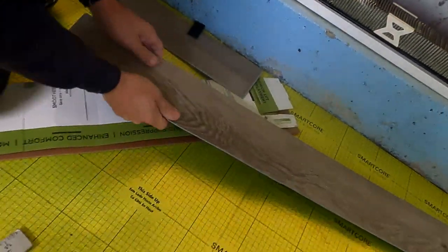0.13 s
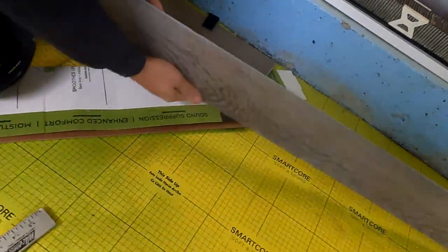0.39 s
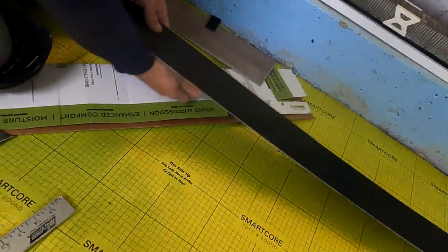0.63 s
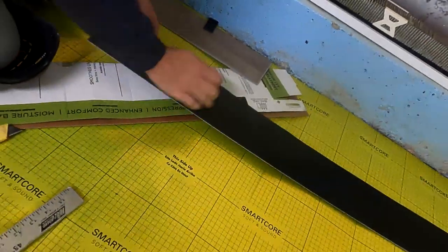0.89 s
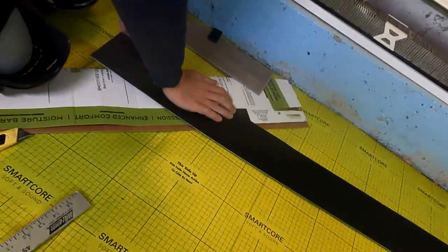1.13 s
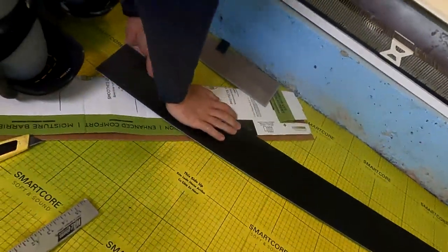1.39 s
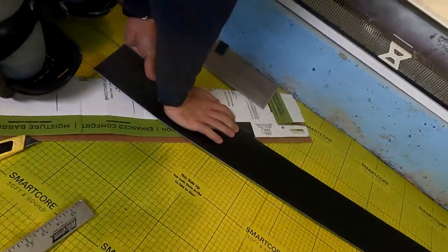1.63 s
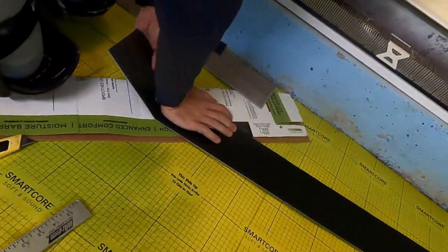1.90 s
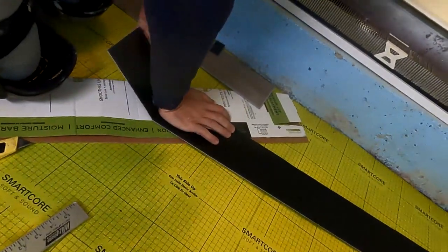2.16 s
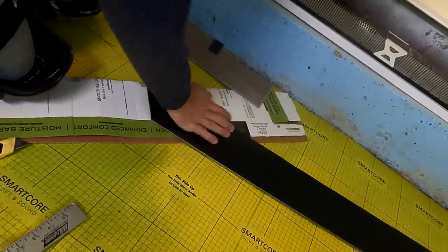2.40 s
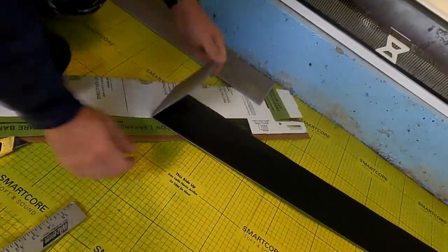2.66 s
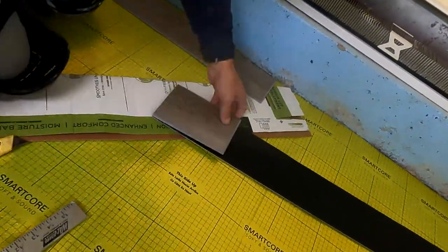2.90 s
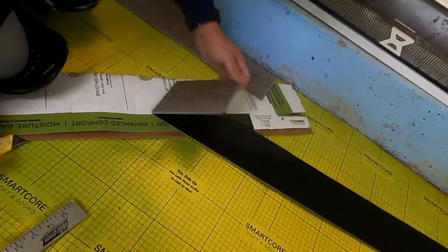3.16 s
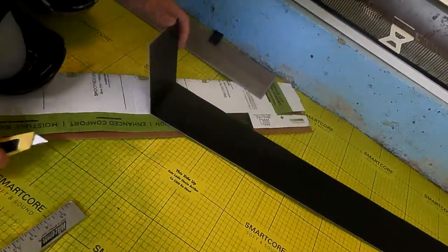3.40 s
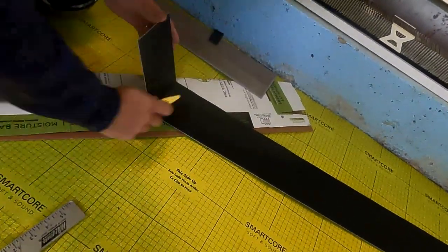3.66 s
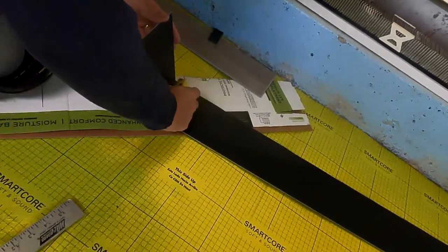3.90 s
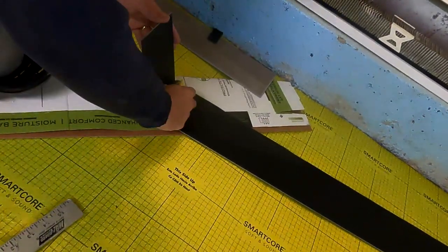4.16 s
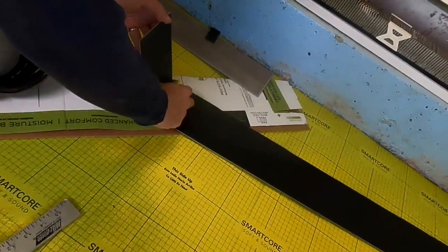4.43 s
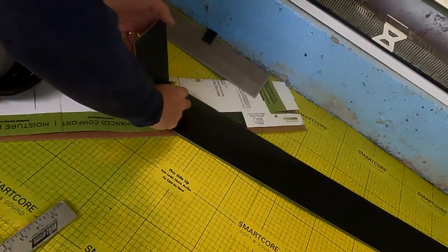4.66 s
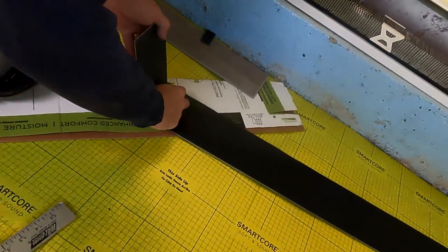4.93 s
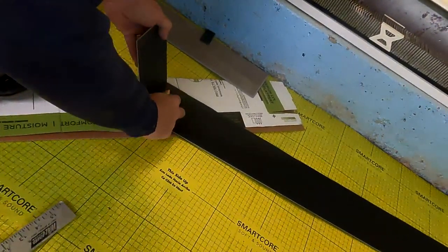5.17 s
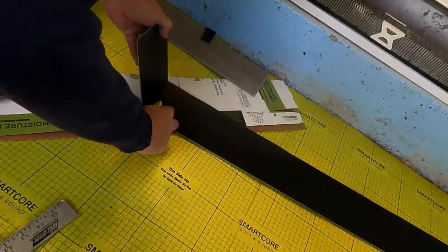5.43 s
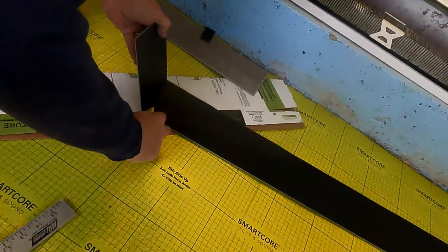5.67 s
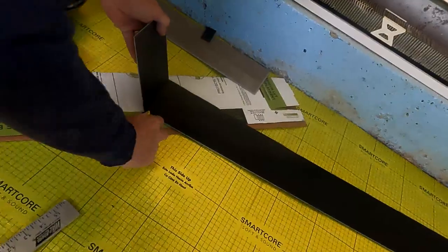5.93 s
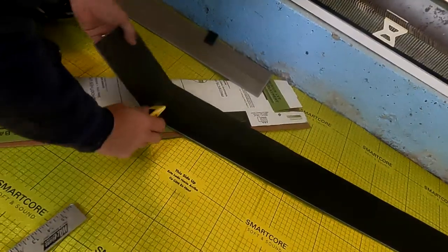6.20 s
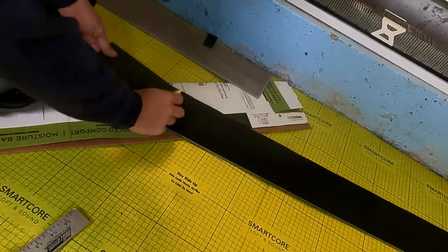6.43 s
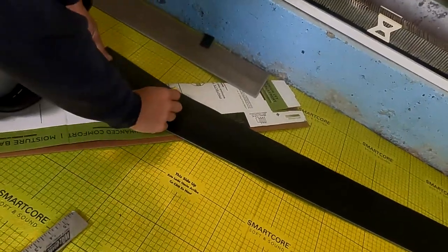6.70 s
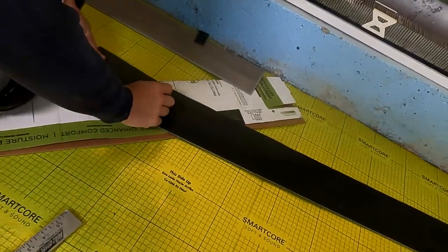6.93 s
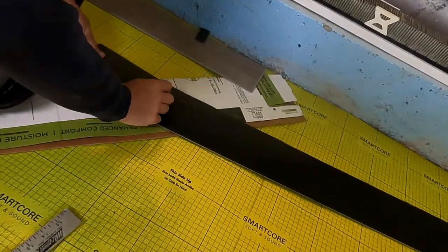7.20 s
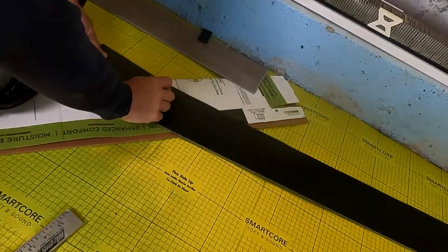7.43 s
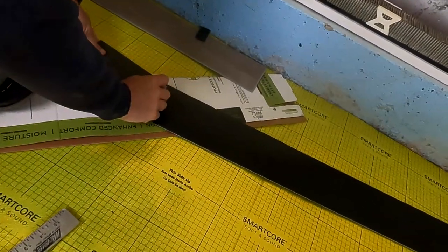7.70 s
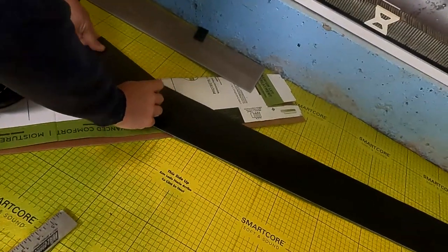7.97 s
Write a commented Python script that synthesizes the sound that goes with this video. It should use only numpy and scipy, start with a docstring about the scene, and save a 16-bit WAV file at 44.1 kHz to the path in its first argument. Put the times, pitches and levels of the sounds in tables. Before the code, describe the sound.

A deep steady machine hum and faint electric tones lie under close stereo handling sounds. A vinyl plank scuffs, thuds and slaps as it is flipped, then cracks loudly along its score. Small knocks and bright metallic knife ticks come next, a quiet pause, then a stuttering, buzzing cut about half a second long. A knock, a few clicks and soft rubs end it in a short-ringing hard room.

```python
"""Soft rubbing and knocks of a vinyl floor plank come first, over a deep machine hum and faint electric tones.
The plank is turned over, snapped along its score and folded; knife clicks come before and after the snap,
and later the utility knife cuts the backing. Short blows ring modes of plank and knife, shaped noise makes
the rubbing, and stick-slip drives the cut. A small hard room answers; two microphone ports sit close by."""
import sys
import numpy as np
from scipy import signal
from scipy.fft import rfft, irfft, next_fast_len
from scipy.io import wavfile
from scipy.ndimage import uniform_filter1d

SR = 44100
rng = np.random.default_rng(int(sys.argv[2]) if len(sys.argv) > 2 else 0)


def nominal_scale(level):
    """Amplitude ratio for a level in decibels (scalar or array-like)."""
    x = np.asarray(level, float) / 20
    return 10 ** x


def inscribe(sig):
    """Save sig as 16-bit PCM at rate SR to the path in sys.argv[1].

    A 1-D sig is mono; a 2-D sig holds one channel per row.
    Samples are clipped to [-1, 1] before scaling.
    """
    pcm = np.round(np.clip(np.atleast_2d(sig).T, -1, 1) * 32767)
    wavfile.write(sys.argv[1], SR, pcm.astype(np.int16))


N = 356313
T = np.arange(N) / SR  # time of each sample [s]

# Slides of plank, hands, sleeves and blade:
# (start [s], length [s], scuff level [dB], hiss level [dB], swell from start to end [dB])
SLIDES = [(0.0, 11, -76.5, -79, -0.5), (0.0, 0.32, -54.5, -52.5, -1), (0.304, 0.27, -59, -56, 5),
          (0.615, 0.19, -53.5, -50, 16), (0.78, 0.12, -42.5, -52, 10.5), (0.95, 0.15, -75, -54.5, 2),
          (1.156, 0.072, -42, -47, -2), (1.344, 0.14, -43.5, -48, 7), (1.566, 0.27, -64, -68.5, 5),
          (2.136, 0.57, -65.5, -58.5, -3.5), (2.789, 0.12, -66, -62, -9), (2.96, 0.012, -41, -48, -13),
          (3.01, 0.18, -86, -65, -3.5), (3.304, 0.076, -53.5, -59.5, -7.5), (3.436, .05, -73, -56.5, 0),
          (3.47, 0.04, -62.5, -54.5, 0), (3.668, 0.06, -58, -54, -2.5), (3.834, 0.17, -67, -67, -2.5),
          (4.02, 0.53, -71.5, -90, -8), (4.297, 0.052, -69.5, -68.5, -11), (4.677, 0.067, -88, -75.5, 12.5),
          (4.846, 0.045, -65, -62, 10.5), (5.1, 0.049, -71, -63, 7.5), (5.151, 0.2, -50, -55.5, 0.5),
          (5.33, 0.4, -53, -53, -2), (5.9, 0.065, -47, -58.5, -3), (6.095, 0.2, -68.5, -63, 9.5),
          (6.33, 0.2, -62.5, -59.5, -11), (6.622, 0.14, -66.5, -65.5, -12), (6.902, 0.59, -65, -83, -4.5),
          (7.772, 0.035, -49.5, -58, 0.5), (7.838, 0.064, -55.5, -62, 4.5), (7.93, 0.12, -63.5, -68, 14.5)]
# Where on the plank the rubbing acts: (time [s], best-driven mode [Hz])
RUB_PLACE = [(0, 800), (.6, 800), (.85, 1400), (1.2, 1200), (1.4, 1500), (2.3, 1300), (2.96, 1400),
             (3.31, 1800), (3.7, 2200), (4.86, 1500), (5.4, 1100), (5.92, 1100), (6.35, 800), (6.65, 1200),
             (7.3, 803), (7.7, 1500), (7.79, 1600), (7.89, 1200), (8.08, 1500)]
# Spectrum of the scuff: (frequency [Hz], relative level [dB])
SCUFF_SPECTRUM = [(290, -26), (500, -4), (589, -7.5), (761, -10), (980, -5), (1460, -7), (2400, -10.5),
                  (3200, -17), (4160, -21), (7040, -45)]
# Spectrum of the sliding hiss: (frequency [Hz], relative level [dB])
HISS_SPECTRUM = [(1470, -30.5), (2500, -5), (2600, -10), (5160, -7.5), (5570, -8.5), (8230, -14.5),
                 (11700, -23), (13700, -29), (15500, -66.5)]
# Centres of the bands that waver alone [Hz]
SCUFF_BANDS_HZ = 350 * 1.4 ** np.arange(8)
HISS_BANDS_HZ = 2000 * 1.4 ** np.arange(7)
# Weight shifting on the floor: (time [s], rumble level [dB])
WEIGHT_SHIFT = [(0.0, -51.5), (0.43, -56), (0.69, -54.5), (2.63, -55), (3.13, -50), (4.59, -62),
                (5.17, -61), (5.36, -59.5), (5.8, -57), (6.05, -60.5), (8.08, -60.5)]
# Spectrum of the floor rumble: (frequency [Hz], relative level [dB])
RUMBLE_SPECTRUM = [(50, -22), (75, -2.5), (130, 6.5), (250, -7.5), (400, -11), (600, -33.5)]
# Faint electric tones: (frequency [Hz], level [dB])
ELECTRIC_TONES = [(183, -67.5), (242.2, -66), (1319, -83), (1561, -78), (1798, -89.5), (1922, -76.5),
                  (2040, -87.5), (2379, -82)]
# Spectrum of the room tone: (frequency [Hz], relative density [dB per Hz])
AIR_SPECTRUM = [(15, -29.5), (25, -7), (53, -14), (62, -10.5), (75, -39.5), (186, -31), (207, -41.5),
                (243, -25.5), (394, -45), (543, -53), (927, -55.5), (1060, -54), (1860, -50), (3260, -74.5),
                (15000, -79.5)]
# How alike the room tone is left and right: (frequency [Hz], likeness [0-1])
AIR_ALIKE = [(60, 0.91), (130, .9), (300, 0), (640, .45), (1400, .3), (3100, .2), (6800, 0.7), (15000, .5)]
# Decay of the room: (frequency [Hz], time to fall 60 dB [s])
ROOM_DECAY = [(100, 0.18), (300, 0.75), (1000, 0.43), (3000, 0.31), (5500, .35), (10000, .2)]
# Knocks on the plank; thump and crack count from the blow level:
# (time [s], blow level [dB], thump below 400 Hz [dB], crack above 3 kHz [dB], best-driven mode [Hz])
KNOCKS = [(0.027, -55.5, 11, 12.5, 1170), (0.141, -38, 0, -17.5, 1140), (0.432, -44.5, 2, 1.5, 1240),
          (0.576, -19.5, -15, -34, 620), (0.648, -37.5, -7, -19, 929), (0.684, -42, -18, 4, 2630),
          (0.776, -28.5, -0.5, -35, 840), (0.82, -15.5, -14.5, -15, 2000), (0.844, -29.5, -11, -2, 2500),
          (0.873, -27, -4, -2, 1730), (0.911, -28, -5.5, -2, 1180), (1.125, -33.5, -24, -15, 1020),
          (1.155, -22, -7.5, -12.5, 1700), (1.176, -20.5, -13, -20, 1010), (1.814, -32, -13, -25, 910),
          (1.823, -23.5, -9, -19, 920), (1.8349, -2, -7, -6.5, 1250), (2.29, -44, -1, -12, 904),
          (2.522, -39, -12, -27, 1190), (2.658, -38, 3, -21.5, 595), (2.797, -50, 3.5, -8, 1570),
          (2.9, -43, 4, -6, 1220), (2.936, -29, -7, -20.5, 1210), (2.945, -19.5, -8.5, -3, 1310),
          (2.951, -19, -5.5, -4, 2300), (3.012, -50, -18, -20, 2100), (3.08, -54.5, 16.5, -6, 2000),
          (3.3, -43, 8, -6, 1910), (3.358, -30.5, -4.5, 5, 2256), (5.882, -22.5, -1, -6.5, 1300),
          (5.955, -40.5, 4, -8.5, 1320), (5.99, -39.5, -8, -2, 1210), (6.011, -44.5, -10, -14, 1500),
          (6.198, -46, -2, -12, 1410), (6.333, -45, 7, -4, 2010), (6.344, -37.5, 3.5, -12, 1000),
          (6.399, -31, -5, -28.5, 610), (6.665, -40.5, -13, -12, 1050), (7.603, -39, -28, -13.5, 1050),
          (7.765, -51, -14, -17, 1140), (7.866, -42.5, -12, -8.5, 1970)]
# Modes of the plank: (frequency [Hz], width [Hz], level [dB])
PLANK_MODES = [(96, 69, -2), (183, 62, -5.5), (318.5, 45, -8), (500, 240, -9), (1020, 180, -7.5),
               (1190, 420, -3.5), (1740, 360, -6), (2300, 550, 0), (3340, 1100, -3), (4700, 800, -2.5),
               (6500, 1700, -5.5), (10080, 3600, -11)]
# Clicks of the knife; body counts from the click level:
# (time [s], click level [dB], body below 2.3 kHz [dB], rattle time [ms], best-driven mode [Hz])
CLICKS = [(0.971, -44, -25, 1.2, 6000), (1.0063, -36.5, -13, 1.2, 4720), (1.0744, -22, -13, 1.5, 4300),
          (1.0843, -23, -17, 1.1, 2530), (1.0957, -26.5, -18, 0.76, 4630), (1.137, -33.5, -20, 1.3, 4200),
          (1.146, -34, -14, 1.9, 4200), (2.61, -40, -21.5, 1.3, 4770), (3.091, -42, -25, 1.2, 8000),
          (3.105, -37, -29, 1.2, 7660), (3.126, -40.5, -42, 4.3, 6240), (3.158, -48, -15, 1.5, 3620),
          (3.19, -50, -22, 0.38, 6000), (3.245, -52.5, -12, 1.25, 6000), (3.353, -33.5, -24.5, 2.2, 5500),
          (3.44, -38, -17, 1.3, 4940), (3.486, -46, -20, 1.5, 7000), (3.4962, -34.5, -15, 1.5, 4830),
          (3.5294, -40.5, -10, 1.4, 5000), (3.561, -25, -18, 1.3, 6520), (3.5738, -24, -14.5, 1.1, 3330),
          (3.652, -41, -20, 1.2, 3900), (3.6643, -21.5, -27, 1.3, 4170), (3.675, -25.5, -32, 0.49, 4270),
          (3.683, -16, -29, 1.7, 4150), (3.6884, -15, -26, 1.4, 5200), (3.698, -32, -20, 1.4, 4300),
          (3.7135, -25, -34, 1.4, 4400), (3.7166, -21.5, -31, 0.93, 4350), (3.7202, -24.5, -32, 1.8, 4250),
          (3.762, -45, -6, 2.5, 2600), (3.8194, -32, -40, 1.8, 3070), (4.295, -32.5, -29.5, 1.1, 4150),
          (4.8791, -42, -5.5, 1.4, 3096), (5.1288, -43.5, 1, 3.5, 2760), (5.9179, -21.5, -20.5, 1.1, 4600),
          (5.9218, -27, -22, 0.9, 4400), (6.3705, -44, -6, 1.6, 5010), (6.45, -40, -6.5, 1.9, 3260),
          (6.627, -18.5, -25, 3, 6000), (6.721, -42, -24, 1.5, 3180), (6.7358, -32, -13, 3.4, 3660),
          (6.7509, -35.5, -17.5, 1.4, 3000), (7.011, -35.5, -27, 2.3, 4160),
          (7.2, -49.5, -22.5, 1.74, 3500), (7.39, -55.5, -23, 1.5, 3190), (7.558, -53.5, -6.5, 1.7, 2980),
          (7.725, -52.5, -2, 1.6, 4000), (7.975, -52, -3, 2.2, 5500), (8.03, -54, -8, 1.5, 6000),
          (8.058, -51, -18, 1.5, 7500)]
# Modes of the knife handle: (frequency [Hz], width [Hz], level [dB])
KNIFE_MODES = [(1400, 620, -9.5), (1926, 680, -1), (2630, 370, -2.5), (3190, 410, -8.5), (4184, 640, 3),
               (5020, 590, -6.5), (5650, 4900, 3), (6870, 520, -4.5), (8100, 4000, 4.5), (9900, 4500, -7),
               (12500, 2000, -2)]
# Narrow mode of the blade: (frequency [Hz], width [Hz], level [dB])
BLADE_PING = [(3330, 35, -9)]
# Blade dragged through the backing: (time [s], mean slip rate [slips per s], pressure [dB],
# unevenness [0-1], blade rattle [dB], best-driven mode [Hz])
CUT = [(5.148, 121, -25, 0.51, -18, 1500), (5.17, 119, -3, 0.21, -14, 1500),
       (5.29, 119.5, -3.5, 0.19, -12, 1250), (5.31, 119, -5, 0.16, -2, 1213),
       (5.352, 119, 2, .35, 2.5, 1200), (5.37, 102, -7, .6, -19, 1250), (5.46, 96, -2.5, 0.4, -2, 1250),
       (5.5, 90, 2.5, 0.5, 6.5, 1150), (5.55, 92, 3.5, .25, -1, 1233), (5.61, 97, 6.5, 0.05, 3, 1150),
       (5.66, 87, -18, 0.66, -12, 1099), (5.72, 81, -14.5, 0.79, -10, 900), (5.8, 59, -29, 0.86, -21, 801)]
# Modes of the backing under the blade: (frequency [Hz], width [Hz], level [dB])
BACKING_MODES = [(244, 43, 8), (380, 230, 22), (490, 44, 4), (570, 87, 13), (1025, 200, 21.5),
                 (1232, 37, 11), (1500, 98, 5.5), (1800, 43, 4.5), (2300, 170, 9)]
# Modes of the rattling blade: (frequency [Hz], width [Hz], level [dB])
BLADE_MODES = [(3500, 360, -14), (4520, 650, 1), (6870, 1100, -11.5), (8730, 1000, -18)]
# Left microphone port against right: (frequency [Hz], level [dB], phase [radians])
PORTS = [(50, 0, -.01), (300, .6, -.06), (1000, -.5, -.22), (2800, -.5, -.6), (5500, 1.8, -.4),
         (9000, 1.2, -.7), (12000, -3, -1.1), (15000, -3.5, -.9)]

GRIP_DB_PER_S, LET_GO_DB_PER_S = 614.5, 302.5  # slopes before and after a slide
HUM_HZ, HUM_DB = 45.8, -39  # centres, both drift a little
AIR_DB = -51
ROOM_DB, ROOM_WIDE = -8, 0.55
# a -30 dB knock has this contact time, halved for every HALVES_DB harder
CONTACT_MS, HALVES_DB = 3.6, 15
SLAP_DB = 3.5
KNOCK_RISE, CLICK_RISE = 0.55, 0.75  # rise of a blow, as a share of its contact time
GROAN_DB, RASP_DB, RATTLE_DB = -43, -38.5, -46  # before pressure or rattle is added
GROAN_SLOPE = 0.26  # dB of groan per dB of pressure
GROAN_LOSS_DB = 2  # lost when the slips are fully uneven
# gain control: level it reacts above, dB taken per dB over, smoothing time, recovery
AGC_DB, AGC_SHARE, AGC_MS, AGC_BACK_DB_PER_S = -29.5, 0.27, 10, 2
TOP_HZ = 15700


def unit(x):
    """Scale to rms 1."""
    return x / np.sqrt(np.mean(x ** 2))


def ring(x, hz, width_hz):
    """Band-pass resonance whose answer to a unit click peaks near 1."""
    r = np.exp(-np.pi * width_hz / SR)
    w = 2 * np.pi * min(hz, .45 * SR) / SR
    return signal.lfilter([.5, 0, -.5], [1, -2 * r * np.cos(w), r * r], x)


def keep(x, lo_hz, hi_hz):
    """Keep the band between two frequencies, by a Butterworth band-pass."""
    band = signal.butter(2, [lo_hz, min(hi_hz, .45 * SR)], "band", fs=SR, output="sos")
    return signal.sosfilt(band, x)


def outline(x, hz, values):
    """Filter by gains given at a few frequencies, joined along log frequency."""
    size = next_fast_len(x.shape[-1])
    at = np.log(np.arange(size // 2 + 1) * SR / size + 1)
    return irfft(rfft(x, size) * np.interp(at, np.log(hz), values), size)[..., :x.shape[-1]]


def colour(x, shape):
    """Filter by a spectrum table, then scale to rms 1."""
    size = next_fast_len(x.shape[-1])
    hz, db = np.transpose(shape)
    at = np.log(np.arange(size // 2 + 1) * SR / size + 1)
    gain = nominal_scale(np.interp(at, np.log(hz), db, left=-90, right=-90))
    return unit(irfft(rfft(x, size) * gain, size)[..., :x.shape[-1]])


def walk(rate):
    """Random levels held 1 / rate s and slewed twice."""
    k = int(SR / rate)
    held = np.repeat(rng.standard_normal(N // k + 1), k)
    return 1.1 * uniform_filter1d(uniform_filter1d(held, k), k)[:N]


def curve(rows):
    """Columns of a timed table, one value a sample."""
    s, *columns = np.transpose(rows)
    return [np.interp(T, s, c) for c in columns]


def grit(spread_db):
    """Noise of many small contacts, some harder than the rest."""
    hardness = np.minimum(rng.exponential(size=N), 5)
    return unit(rng.standard_normal(N) * nominal_scale(spread_db * hardness))


def blows(s, db, ms, hz, push, rise=KNOCK_RISE):
    """What a mode at hz feels of each blow: quick rise, fall over the contact time, a faint settling."""
    out = np.zeros(N + 4096)
    t_ms = np.arange(4096) / SR * 1000
    onset = 1 - np.exp(-t_ms / np.maximum(rise * ms, .05)[:, None])
    fall = np.exp(-t_ms / np.maximum(ms, .1)[:, None])
    settling = .03 * ms[:, None] * np.exp(-t_ms / 12)
    shape = onset * (fall + settling)
    # a one-way push, or a burst of small contacts
    force = shape if push else shape * rng.standard_normal(shape.shape)
    bursts = keep(force, hz / 1.4, hz * 1.4)
    bursts = bursts * np.sqrt(hz / SR / np.sum(bursts ** 2, axis=1, keepdims=True))
    for i, gain, burst in zip((s * SR).astype(int), nominal_scale(db), bursts):
        out[i:i + 4096] += gain * burst
    return out[:N]


def struck(modes, s, db, ms, push=False, rise=KNOCK_RISE):
    """Blows ring each mode; db(hz) gives how hard every blow drives it."""
    return sum(nominal_scale(g) * ring(blows(s, db(hz), ms, hz, push, rise), hz, w) for hz, w, g in modes)


def slides():
    """Scuff and hiss gains: each slide grips fast, swells or fades while it lasts, then lets go."""
    power = np.zeros((2, N))
    for s, length, scuff_db, hiss_db, swell_db in SLIDES:
        db = swell_db * (np.clip((T - s) / length, 0, 1) - .5)
        db = db - GRIP_DB_PER_S * np.maximum(s - T, 0)
        db = db - LET_GO_DB_PER_S * np.maximum(T - s - length, 0)
        power += nominal_scale(db + np.array([[scuff_db], [hiss_db]])) ** 2
    return np.sqrt(power)


def wander(x, hz):
    """One band of the rubbing, its level wavering alone."""
    return ring(x, hz, hz / 2.5) * hz * nominal_scale(2.5 * walk(30))


def rubbing():
    """Gritty sliding: a scuff in the plank's middle modes and a hiss above, catching together."""
    scuff_gain, hiss_gain = slides()
    best_hz, = curve(RUB_PLACE)
    # the grip stutters every few ms and catches more slowly
    contact = unit(grit(3) * nominal_scale(2.8 * walk(350)))
    catch = nominal_scale(1.5 * walk(60))
    plank = sum(nominal_scale(g) * unit(ring(contact, hz, w)) for hz, w, g in PLANK_MODES if 700 < hz < 3000)
    scuff = unit(colour(contact, SCUFF_SPECTRUM) + .3 * unit(plank))
    hiss = colour(contact, HISS_SPECTRUM)
    # bands far from the best-driven mode are weaker
    scuff = sum(wander(scuff, hz) * nominal_scale(-6.0 * np.log2(hz / best_hz) ** 2) for hz in SCUFF_BANDS_HZ)
    hiss = sum(wander(hiss, hz) for hz in HISS_BANDS_HZ)
    return catch * (unit(scuff) * scuff_gain + unit(hiss) * hiss_gain)


def shifting():
    """Knees and hands load the floor: a dull uneven rumble."""
    level_db = curve(WEIGHT_SHIFT)[0] + 4 * walk(8)
    return colour(rng.standard_normal(N), RUMBLE_SPECTRUM) * nominal_scale(level_db)


def hum():
    """A large machine far off, a drifting sine, with thin electric tones above it."""
    deep_phase = 2 * np.pi * np.cumsum(HUM_HZ + 0.33 * walk(3.3)) / SR
    mix = np.sqrt(2) * nominal_scale(HUM_DB + 0.91 * walk(13)) * np.sin(deep_phase)
    for hz, db in ELECTRIC_TONES:
        tone = np.sin(2 * np.pi * hz * T + rng.uniform(0, 2 * np.pi))
        mix = mix + np.sqrt(2) * nominal_scale(db + 0.9 * walk(7.7)) * tone
    return mix


def air():
    """Room tone: noise alike on both sides in the bass, mostly wider above."""
    mid, side = rng.standard_normal((2, N))
    hz, alike = np.transpose(AIR_ALIKE)
    alike = np.clip(alike, 0, 1)
    shared = outline(mid, hz, np.sqrt(1 + alike))
    opposed = outline(side, hz, np.sqrt(1 - alike)) * np.array([[1], [-1]])
    return nominal_scale(AIR_DB + 1.0 * walk(2.7)) * colour(shared + opposed, AIR_SPECTRUM)


def room(x):
    """Diffuse echoes with a decay time for each band, a little different left and right."""
    t = np.arange(int(.7 * SR)) / SR
    mid, side = rng.standard_normal((2, len(t)))
    # the sides differ less in the bass
    wide = ROOM_WIDE * signal.lfilter([1, -1], [1, -.93], side)
    noise = mid + wide * np.array([[1], [-1]])
    hz, t60 = np.transpose(ROOM_DECAY)
    tail = 0
    for f in 60 * 2 ** np.arange(0, 8, .5):
        half_octave = signal.butter(1, [f / 2 ** .25, f * 2 ** .25], "band", fs=SR, output="sos")
        decay = nominal_scale(-60 * t / np.interp(np.log(f), np.log(hz), t60))
        tail = tail + signal.sosfilt(half_octave, noise) * decay
    tail = tail * np.clip(t / 0.0027, 0, 1)
    tail = tail / np.sqrt(np.sum(tail ** 2) / 2)
    return signal.fftconvolve(x[None], tail, axes=1)[:, :N]


def knocks():
    """Every knock rings the same plank; where it lands sets which modes it drives; the flat slap is broad."""
    s, db, thump_db, crack_db, best_hz = np.transpose(KNOCKS)
    ms = np.minimum(CONTACT_MS * 2 ** (-(db + 30) / HALVES_DB), 5)
    # low modes feel only the one-way push
    low = struck(PLANK_MODES[:3], s, lambda hz: db + thump_db + 6.0, ms / 2, push=True)
    mid = struck(PLANK_MODES[3:8], s, lambda hz: db + 8.5 - 2.5 * np.log2(hz / best_hz) ** 2, ms)
    high = struck(PLANK_MODES[8:], s, lambda hz: db + crack_db + 13.5, ms)
    # five octaves from 700 Hz, each 3 dB weaker
    slap_db = db + crack_db + SLAP_DB
    slap = sum(blows(s, slap_db - 3 * k, ms / 5, 700 * 2 ** k, True) for k in range(5))
    return low + mid + high + slap


def clicks():
    """Slider and blade tick in the handle of the knife, ringing its modes."""
    s, db, body_db, ms, best_hz = np.transpose(CLICKS)
    body = struck(KNIFE_MODES[:2], s, lambda hz: db + body_db + 15.5, ms, rise=CLICK_RISE)
    handle = struck(KNIFE_MODES[2:], s, lambda hz: db + 4.5 - 7.5 * np.log2(hz / best_hz) ** 2,
                    ms, rise=CLICK_RISE)
    tick = blows(s, db - 21, ms / 2, 11000, False, CLICK_RISE)
    # the blade pings on only when struck close to its own mode
    ping = struck(BLADE_PING, s, lambda hz: db - 90 * np.log2(hz / best_hz) ** 2, ms / 10, push=True)
    return body + tick + ping + handle


def cut():
    """The blade sticks and slips, steady at first, then slower and more uneven; backing rings, blade rattles."""
    rate, pressure_db, uneven, rattle_db, best_hz = curve(CUT)
    uneven = np.clip(uneven, 0, 1)
    turns = np.cumsum(rate * (1 + .12 * uneven * walk(120))) / SR
    at = np.flatnonzero(np.diff(np.floor(turns)))  # samples where the blade slips
    chance = rng.standard_normal((len(at), 1 + len(BLADE_MODES)))
    slips, ticks = np.zeros(N), np.zeros((len(BLADE_MODES), N))
    slips[at] = nominal_scale(1.7 * uneven[at] * chance[:, 0])
    # the blade rebounds just ahead of the slip; uneven stretches go hard and soft by turns
    hard_soft_db = 6 * uneven[at] * (-1.) ** np.arange(len(at))
    ticks[:, at - int(.002 * SR)] = nominal_scale(2.5 * chance[:, 1:].T + hard_soft_db)
    # grit is strongest right after a slip
    since_slip = .4 + np.exp(-(turns % 1) / .4)
    drive = slips + .18 * (.15 + uneven) * grit(2) * since_slip
    groan = sum(nominal_scale(g) * ring(slips + 0.69 * drive, hz, w) for hz, w, g in BACKING_MODES if hz < 750)
    rasp = sum(nominal_scale(g - 5.7 * np.log2(hz / best_hz) ** 2) * ring(drive, hz, w)
               for hz, w, g in BACKING_MODES if hz > 750)
    # each tick becomes a short decaying burst of noise
    ticks = signal.lfilter([1], [1, -.98], ticks) * rng.standard_normal(ticks.shape)
    rattle = sum(nominal_scale(g) * unit(ring(ring(tick, hz, w), hz, w))
                 for tick, (hz, w, g) in zip(ticks, BLADE_MODES))
    on = uniform_filter1d(1. * (T > CUT[0][0]) * (T < CUT[-1][0]), size=800)
    groan_db = GROAN_DB + GROAN_SLOPE * pressure_db - GROAN_LOSS_DB * uneven
    groan = nominal_scale(groan_db) * unit(keep(groan, 174, 510))
    rasp = nominal_scale(RASP_DB + pressure_db) * unit(keep(rasp, 500, 2950))
    return on * (groan + rasp + nominal_scale(RATTLE_DB + rattle_db) * unit(rattle))


def ports(x, pan_db=0):
    """Two close microphone ports: the left differs in level and phase."""
    hz, db, radians = np.transpose(PORTS)
    left = outline(x, hz, nominal_scale(db + pan_db / 2) * np.exp(1j * radians))
    return np.array([left, x * nominal_scale(-pan_db / 2)])


def scene():
    """Work on the plank close to the microphone, with the room's answer, over hum and room tone."""
    hands, plank, knife = rubbing(), knocks(), clicks() + cut()
    near = ports(plank + shifting() + hum()) + ports(hands, .4) + ports(knife, 1.0)
    # three independent noise draws of the same knocks are summed, for a smoother tail
    plank_tail = sum(room(knocks()) for _ in range(3)) / np.sqrt(3)
    # the knife sounds drier: less of it goes to the room
    answer = plank_tail + room(hands + nominal_scale(-8) * knife)
    return near + nominal_scale(ROOM_DB) * answer + air()


def top_cut(x):
    """Nothing passes above the cut-off."""
    return signal.sosfilt(signal.butter(12, 16480, fs=SR, output="sos"), x)


def record(dry):
    """Gain control ducks after loud sounds and creeps back; peaks past full scale are flattened, the top cut."""
    k = 1000 / AGC_MS / SR
    power = signal.lfilter([k], [1, k - 1], np.mean(dry ** 2, axis=0))
    duck_db = AGC_SHARE * np.maximum(10 * np.log10(power + 1e-12) - AGC_DB, 0)
    # hold the deepest duck, less the steady recovery since
    recovery_db = AGC_BACK_DB_PER_S * T
    duck_db = np.maximum.accumulate(duck_db + recovery_db) - recovery_db
    duck_db = signal.lfilter([k], [1, k - 1], duck_db)
    flattened = np.clip(dry * nominal_scale(-duck_db), -1, 1)
    low_pass = signal.ellip(8, .3, 60, TOP_HZ, fs=SR, output="sos")
    mix = signal.sosfilt(low_pass, flattened)
    return top_cut(mix)


dry = scene()
out = record(dry)
inscribe(out)
```